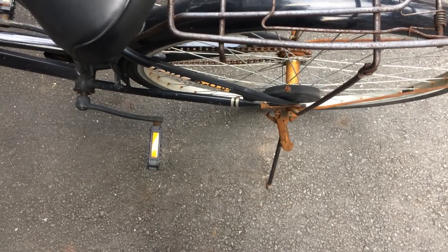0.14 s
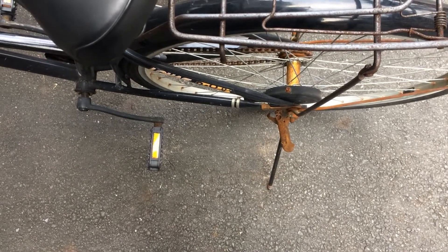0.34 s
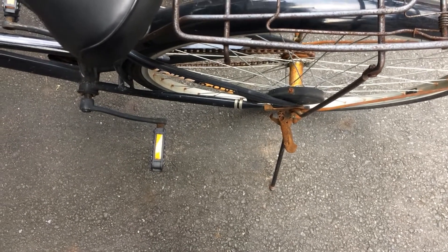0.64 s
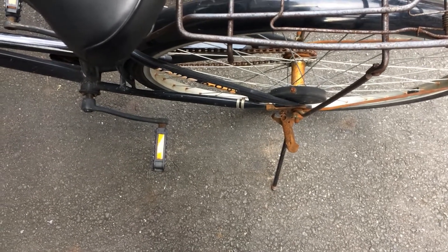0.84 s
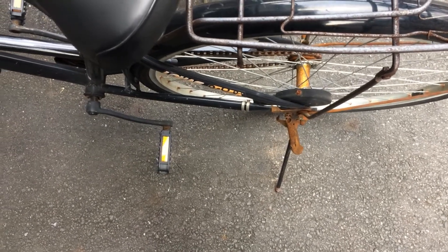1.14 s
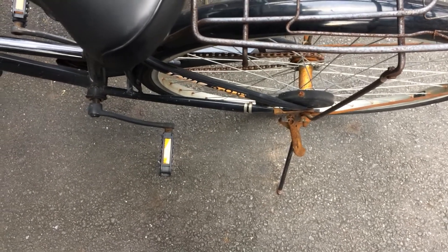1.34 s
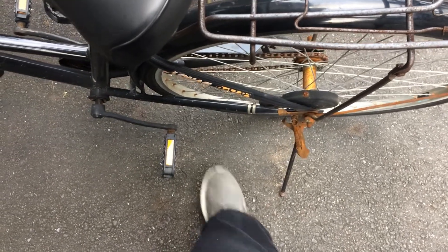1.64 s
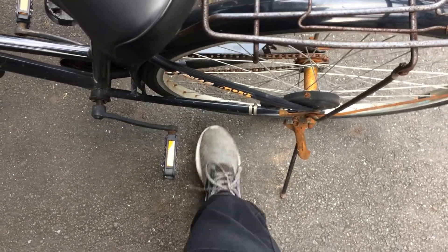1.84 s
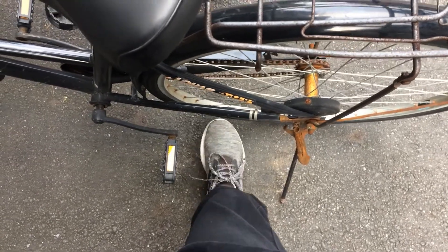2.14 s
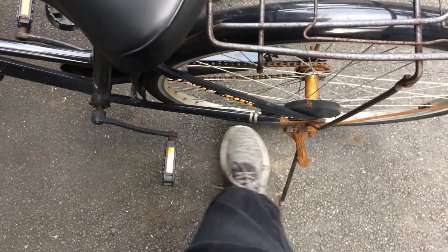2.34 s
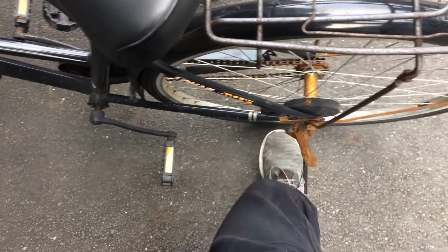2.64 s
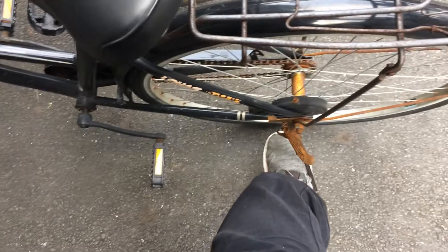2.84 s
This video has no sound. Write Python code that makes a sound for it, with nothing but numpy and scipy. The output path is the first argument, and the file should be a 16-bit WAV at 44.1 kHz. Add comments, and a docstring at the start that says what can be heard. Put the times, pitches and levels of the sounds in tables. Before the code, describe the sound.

A small engine idles throughout with a slow, low throb over distant traffic. Sharp ticks and metallic clatter stand out in the first 0.8 seconds and fade under the exhaust hum by 2.2. Metal squeaks faintly around 0.7. A light tick comes at 1 second, trousers rustle softly near 1.7, and a shoe taps a bicycle kickstand more firmly at 2.6, followed by a short rustle.

```python
"""A street beside a parked bicycle. From the start a small engine throbs slowly over distant traffic:
each firing puffs through the pipe and rattles the casing, and the valves tick, with hard snaps at first.
From 0.7 s metal squeaks faintly. A shoe steps up to the kickstand: a light tick rings the steel at 1 s,
and cloth rustles around 1.7 s. By 2.2 s the clatter and ticking have faded under the exhaust hum.
A firmer tick at 2.6 s and a short rustle follow while the engine runs on."""
import sys
import numpy as np
from scipy import signal
from scipy.fft import rfft, irfft, next_fast_len
from scipy.io import wavfile
from scipy.ndimage import uniform_filter1d, map_coordinates

SR = 44100
rng = np.random.default_rng(int(sys.argv[2]) if len(sys.argv) > 2 else 0)


def dump(signal):
    """Clip the signal to [-1, 1] and save it as 16-bit WAV at the path in sys.argv[1]."""
    limited = np.clip(np.atleast_2d(signal).T, -1, 1)
    pcm = np.round(limited * 32767).astype(np.int16)
    wavfile.write(sys.argv[1], SR, pcm)


N = 132741


def amp(db):
    """Decibels to gain."""
    return 10 ** (np.asarray(db) / 20)


def unit(x):
    """Scaled to rms 1."""
    return x / np.sqrt(np.mean(x ** 2) + 1e-20)


def clock():
    """The time of each sample in seconds."""
    return np.arange(N) / SR


def curves(rows):
    """Automation: one value per sample for each column after the time."""
    times, *columns = np.transpose(rows)
    return [np.interp(clock(), times, column) for column in columns]


def swells(rows):
    """An envelope of bell-shaped swells."""
    return sum(amp(db) * np.exp(-((clock() - s) / half) ** 2) for s, half, db in rows)


def wobble(rate):
    """A smooth random curve, rate knots a second."""
    return map_coordinates(rng.standard_normal(int(N * rate / SR) + 4), [clock() * rate])


def filtered(x, response):
    """x through a complex frequency response."""
    size = next_fast_len(N + SR // 2)
    return irfft(rfft(x, size) * response(np.fft.rfftfreq(size, 1 / SR)), size)[..., :N]


def lowpass(x, hz, slope):
    """Rolls off the highs by 6 * slope dB an octave."""
    return filtered(x, lambda f: 1 / (1 + (f / hz) ** slope))


def highpass(x, hz, slope):
    """Rolls off the lows by 6 * slope dB an octave."""
    return filtered(x, lambda f: f ** slope / (f ** slope + hz ** slope))


def noise(colour, patchy_db):
    """Noise of rms 1 with an EQ curve and patches of random gain in time and frequency."""
    spectrum = signal.stft(rng.standard_normal(N), nperseg=512)[2]
    patches = uniform_filter1d(rng.standard_normal(spectrum.shape), size=5, axis=0)
    patches = uniform_filter1d(patches, size=14, axis=1)
    patchy = signal.istft(spectrum * amp(patchy_db * unit(patches)), nperseg=512)[1][:N]
    hz, db = np.transpose(colour)
    return unit(filtered(patchy, lambda f: amp(np.interp(np.log(f + 1), np.log(hz + 1), db))))


def ring(drive, body):
    """Noise shaped by the drive rings a body's resonances; rms 1."""
    def response(f):
        return sum((-1) ** k * amp(db) * 1j * f * width / (hz * hz - f * f + 1j * f * width)
                   for k, (hz, width, db) in enumerate(body))
    return unit(filtered(drive * rng.standard_normal(N), response))


# EQ of the traffic bed: (frequency [Hz], relative level [dB])
TRAFFIC_EQ = [(15, -11), (25, -12), (82, -8), (140, -3), (188, -8.5), (240, -10), (410, -15.5),
              (648, -15.5), (871, -17.5), (970, -20), (1240, -18), (2060, -16), (2700, -26.5),
              (3170, -24.5), (4620, -35), (12200, -49), (15500, -56)]
# treble shelf on the bed: (time [s], gain [dB])
TREBLE_RIDE = [(0, 5.5), (.5, 1.5), (1.1, 1), (1.65, -1), (2.3, -0.5), (3, -1)]
# hollow street resonances: (frequency [Hz], width [Hz], relative level [dB])
STREET_MODES = [(309, 85, -1), (926, 60, -1.5), (1026, 53, -1)]
def street():
    """Far traffic: a rumbling bed with slowly shifting treble and a few hollow tones."""
    wash = noise(TRAFFIC_EQ, patchy_db=1.04)
    treble_db, = curves(TREBLE_RIDE)
    shelf = (amp(treble_db) - 1) * highpass(wash, 1500, slope=2)
    hollow = ring(amp(0.37 * wobble(8.2)), STREET_MODES)
    return amp(-45.5) * (wash + shelf) + amp(-53.5) * unit(lowpass(hollow, 1600, slope=4))


# faint squeak cues: (time [s], half length [s], level [dB])
SQUEAK_CUES = [(0.668, 0.0082, -60.5), (0.712, 0.045, -75), (.975, 0.016, -71), (1.54, 0.012, -69)]
def squeaks(pitch_hz=5710, jitter=0.0028):
    """Metal squeaks: a thin, unsteady tone with a softer octave."""
    phase = 2 * np.pi * np.cumsum(pitch_hz * (1 + jitter * wobble(360))) / SR
    return np.sqrt(2) * swells(SQUEAK_CUES) * (np.sin(phase) + amp(-11) * np.sin(2 * phase))


# light ticks at the kickstand: (time [s], tick level [dB], steel ring level [dB])
TAP_CUES = [(1.0205, -55, -62), (2.5586, -46.5, -70), (2.5765, -55, -76)]
# EQ of a tick: (frequency [Hz], relative level [dB])
TAP_EQ = [(200, -3), (1500, 11), (3800, 1), (6000, -2), (12000, -7.5), (15500, -10)]
# shoe and trouser rustles: (time [s], half length [s], level [dB])
RUSTLE_CUES = [(1.7, 0.28, -69.5), (2.74, 0.047, -69.5)]
# EQ of a rustle: (frequency [Hz], relative level [dB])
RUSTLE_EQ = [(1000, -2), (4000, 3), (9000, 3), (15000, -7)]
def foot(attack_s=.0004, decay_s=.0075):
    """Dry ticks and soft, gritty rustles as the foot comes up to the stand."""
    hits = 0
    for s, db, _ in TAP_CUES:
        age = np.maximum(clock() - s, 0)
        hits += amp(db) * (1 - np.exp(-age / attack_s)) * np.exp(-age / decay_s)
    grit = amp(2.6 * wobble(600))
    taps = hits * noise(TAP_EQ, patchy_db=1)
    rustles = swells(RUSTLE_CUES) * noise(RUSTLE_EQ, patchy_db=1)
    return grit * (taps + rustles)


# modes of the bicycle's steel: (frequency [Hz], relative level [dB], time to fall 60 dB [s])
STEEL_MODES = [(5070, 2, .1), (6250, 2, .07), (8250, -3, 0.056), (9600, -6, .04), (12710, -6, .05),
               (14090, -6, .05), (15000, -7, .04)]
def steel():
    """Each tick of the foot leaves a brief, thin ring in the bicycle's steel."""
    tails = 0
    for s, _, ring_db in TAP_CUES:
        age = np.maximum(clock() - s, 0)
        for hz, db, t60 in STEEL_MODES:
            envelope = amp(ring_db + db + rng.normal(0, 1) - 60 * age / t60)
            tails += envelope * np.sin(2 * np.pi * hz * age)
    return tails


# valve tick resonances: (frequency [Hz], width [Hz], relative level [dB])
VALVE_MODES = [(3660, 130, -1), (3980, 400, 0), (5600, 73, -1), (6100, 1900, -19), (8000, 210, -4)]
# the sharpest engine ticks: (time [s], level [dB])
SNAP_CUES = [(.0468, -42), (0.091, -50), (0.1212, -45), (.1495, -54), (0.1663, -51), (.1950, -49),
             (.2100, -50), (0.255, -42), (0.3728, -44), (0.404, -52), (0.433, -48.5), (0.5663, -50.5),
             (0.713, -46), (.7580, -53)]
# EQ of a snap: (frequency [Hz], relative level [dB])
SNAP_EQ = [(1000, -17), (2800, -10), (3900, 16.5), (4900, -10.5), (6800, -2.5), (8000, -12), (10000, -33),
           (15000, -38)]
def valves(cycle, rate, tick_decay_s=.0016, snap_decay_s=.003, fade_db_per_s=12):
    """Two small valve ticks per firing, uneven and fading, with much harder snaps early on."""
    t = clock()
    beat = 2 * (cycle - .33) + 4  # counts ticks, starting above zero
    accent_db = 3 * rng.uniform(-1, 1, size=256)[beat.astype(int)]
    age = (beat % 1) / (2 * rate)
    drive = amp(accent_db) * np.exp(-age / tick_decay_s)
    ticks = unit(lowpass(ring(drive, VALVE_MODES), 9000, slope=6))
    snaps = sum(amp(db) * (t >= s) * np.exp(-np.abs(t - s) / snap_decay_s) for s, db in SNAP_CUES)
    return amp(-62.5 - fade_db_per_s * t) * ticks + snaps * noise(SNAP_EQ, patchy_db=4)


# fader of the casing's ringing note: (time [s], level [dB])
PING_RIDE = [(0, -55), (.06, -47.7), (.29, -45.7), (.54, -51), (.9, -59), (1.1, -66), (1.42, -59),
             (1.65, -65), (2.0, -62), (2.19, -56.5), (2.32, -64), (2.5, -62), (2.7, -70), (3.0, -71)]
def ping(cycle, pitch_hz=2090, sag_hz_per_s=11, lead_cycles=.17, rise_cycles=.22):
    """Each firing strikes the casing's main note: a quick rise, a slower fall, a slow sag in pitch."""
    level_db, = curves(PING_RIDE)
    age = (cycle + lead_cycles) % 1 / rise_cycles
    stroke = .2 + (age * np.exp(1 - age)) ** 2  # the floor rings on between firings
    phase = 2 * np.pi * np.cumsum(pitch_hz - sag_hz_per_s * clock()) / SR
    flutter = amp(2 * wobble(60))
    drift = .75 * (wobble(70) + 2 * wobble(12))
    return amp(level_db) * unit(flutter * stroke * np.sin(phase + drift))


# fader of the clatter: (time [s], level before trim [dB])
CLATTER_RIDE = [(0, -45.5), (.08, -44.5), (.35, -46), (1.0, -53), (1.9, -53.5), (2.2, -70), (2.4, -69),
                (3.0, -71)]
# engine casing resonances: (frequency [Hz], width [Hz], relative level [dB])
CASING_MODES = [(1025, 43, -7.5), (1660, 113, -9.5), (2097, 170, -7.5), (2414, 150, -7.5), (2715, 71, -9.5)]
def clatter(cycle, trim_db=-3.5, lag_cycles=0.015, sharpness=0.45):
    """The engine casing rattles twice for each firing."""
    level_db, = curves(CLATTER_RIDE)
    drive = np.exp(sharpness * np.cos(2 * np.pi * (cycle - lag_cycles)) ** 4)
    rattle = unit(lowpass(ring(drive, CASING_MODES), 3000, slope=6))
    return amp(level_db + trim_db) * rattle


# fader of the midrange drone: (time [s], level [dB])
DRONE_RIDE = [(0, -46.5), (.25, -49.5), (.38, -58.5), (.6, -52), (.7, -52.5), (.93, -48), (1.15, -60),
              (1.42, -58.5), (1.66, -49), (1.87, -71), (2.05, -52.5), (2.17, -57), (2.31, -49),
              (2.5, -52.5), (2.67, -55.5), (2.87, -52.5), (3.0, -61)]
# hollow engine resonances: (frequency [Hz], width [Hz], relative level [dB])
DRONE_MODES = [(400.6, 46, -0.5), (444, 9.8, -3)]
def drone(cycle):
    """A hollow resonance of the engine, pushed by each firing, swells and sinks."""
    level_db, = curves(DRONE_RIDE)
    hollow = ring(1 + np.cos(2 * np.pi * cycle), DRONE_MODES)
    mids = lowpass(highpass(hollow, 300, slope=4), 560, slope=6)
    return amp(level_db) * unit(mids)


# faders of the wavering exhaust hum: (time [s], 4th harmonic level [dB], 5th harmonic level [dB])
HUM_RIDE = [(0.0, -39, -46), (0.14, -39, -50), (0.26, -39, -42.5), (0.87, -39.5, -46.5), (0.93, -41.5, -56),
            (1.14, -39, -46), (1.39, -42, -55), (1.43, -43, -79), (1.47, -56, -43), (1.52, -57, -47),
            (1.7, -41, -45.5), (2.0, -40, -46), (2.08, -44, -49.5), (2.27, -48.5, -58), (2.51, -40.5, -50),
            (2.56, -39.5, -87), (2.96, -43, -43), (3.01, -54, -42)]
# the other exhaust tones: (harmonic [x firing rate], level against the 4th [dB])
HARMONICS = [(2, -12), (3, -26), (6, -11.5), (7, -32), (8, -25), (9, -22.5), (10, -27.5), (11, -28.5),
             (12, -23.5), (13, -26)]
# pipe resonances rung by each puff: (frequency [Hz], width [Hz], relative level [dB])
PIPE_MODES = [(67, 35, 12), (157, 130, 6.8)]
def exhaust(cycle, puff_db=-52.5, puff_fade_db_per_s=3.5):
    """The throb: harmonics of the firing rate, smeared by the pipe, with a noisy puff at each firing."""
    def tone(k, db, lag=0):
        return np.sqrt(2) * amp(db) * np.cos(2 * np.pi * k * cycle - lag)
    fourth_db, fifth_db = curves(HUM_RIDE)
    hum = tone(4, fourth_db) + tone(5, fifth_db)
    for k, db in HARMONICS:
        waver_db = 1.5 * wobble(6.68)
        smear = -.35 * (k - 4) * (k - 5)  # radians: the pipe shifts tones far from its main note
        drift = .06 * k * wobble(8)
        hum += tone(k, fourth_db + db + waver_db, smear + drift)
    drive = np.cos(np.pi * cycle) ** 8 * amp(fourth_db - puff_fade_db_per_s * clock())
    puffs = lowpass(highpass(ring(drive, PIPE_MODES), 45, slope=4), 600, slope=4)
    return hum + amp(puff_db) * unit(puffs)


# engine speed: (time [s], firing rate [Hz])
FIRING_RATE = [(0.0, 33.9), (0.62, 33.9), (1.35, 33.3), (1.49, 32.8), (1.68, 34.0), (1.78, 34.2),
               (1.99, 34.1), (2.25, 33.3), (2.67, 33.4), (2.78, 33.9), (3.01, 34.1)]
def engine(first_firing_s=.0115):
    """A small, slow-running engine: one count of firings sets the pulse of all five layers."""
    rate, = curves(FIRING_RATE)
    cycle = np.cumsum(rate) / SR - first_firing_s * rate[0]
    return exhaust(cycle) + drone(cycle) + clatter(cycle) + ping(cycle) + valves(cycle, rate)


def scene():
    """Engine, street, foot and bicycle in a mono mix, alike in both channels."""
    mix = engine() + street() + foot() + steel() + squeaks()
    return np.array([mix, mix])


def record(dry, top_hz=15720):
    """A brick-wall high cut on the whole mix."""
    return filtered(dry, lambda hz: hz < top_hz)


dry = scene()
out = record(dry)
dump(out)
```